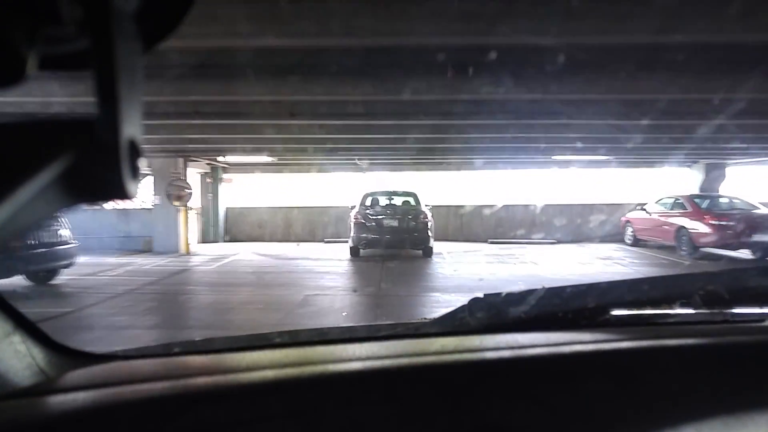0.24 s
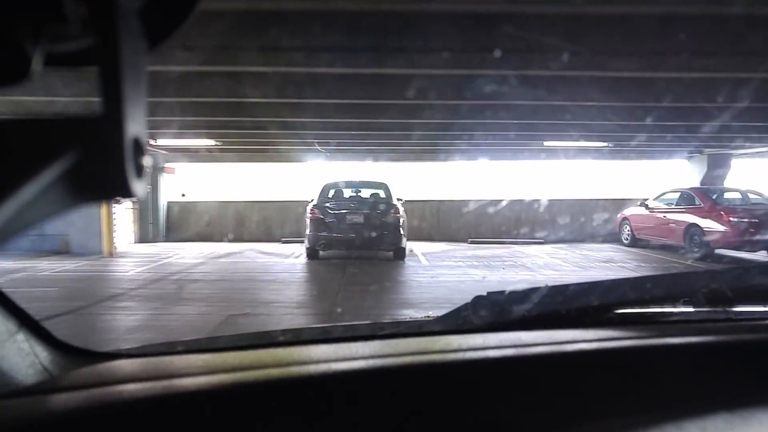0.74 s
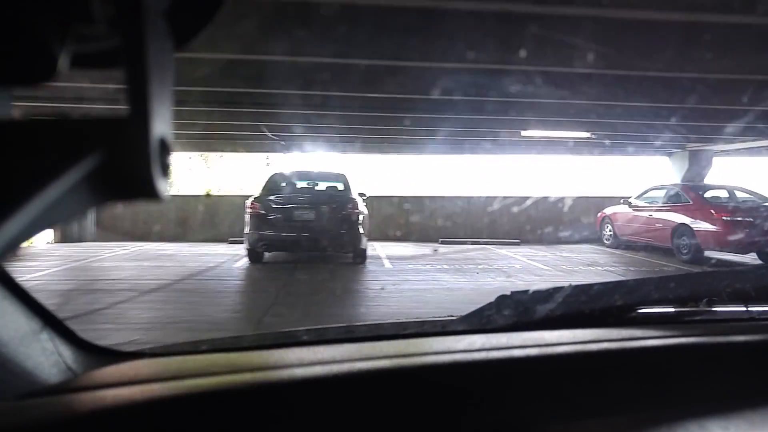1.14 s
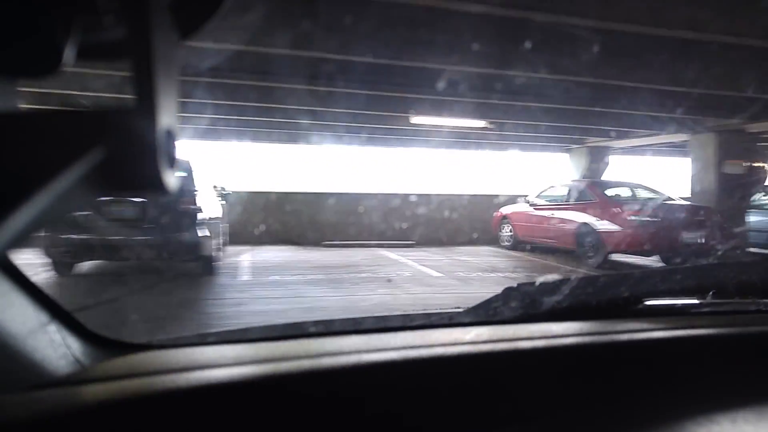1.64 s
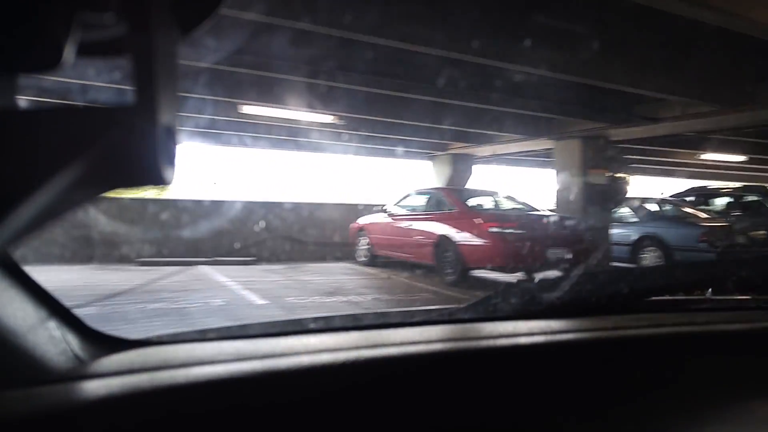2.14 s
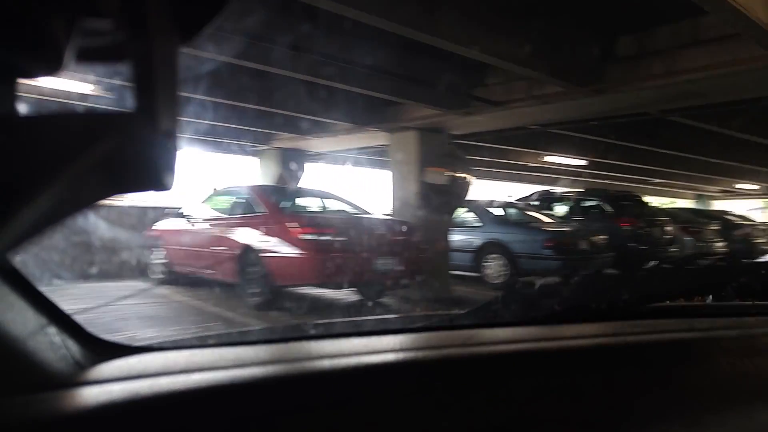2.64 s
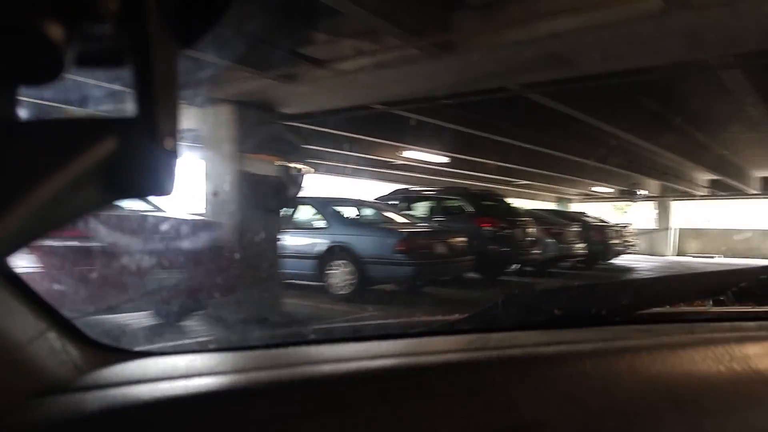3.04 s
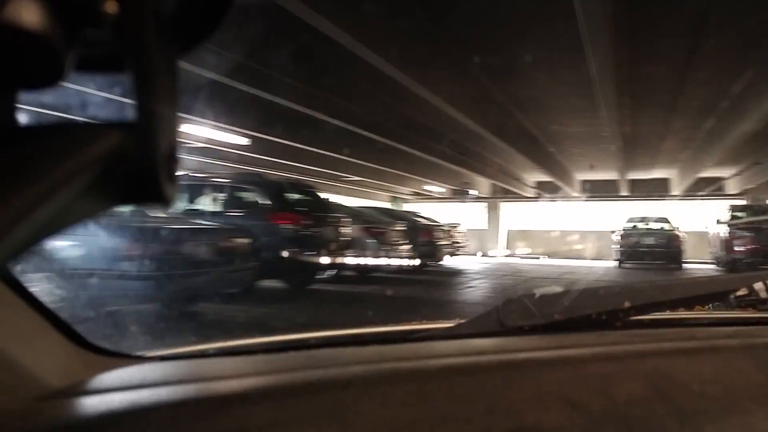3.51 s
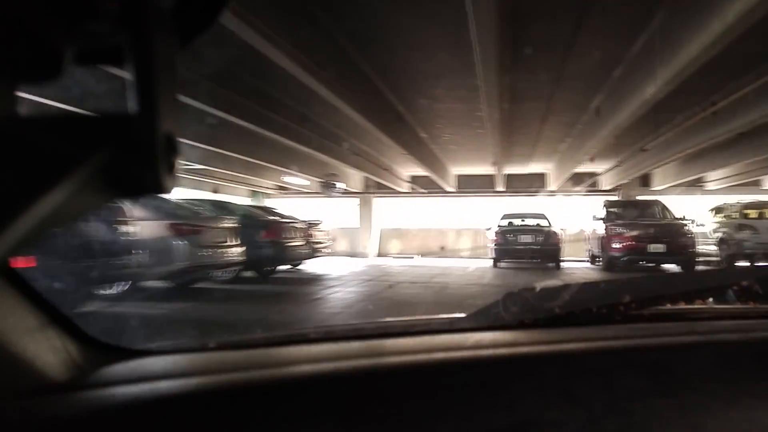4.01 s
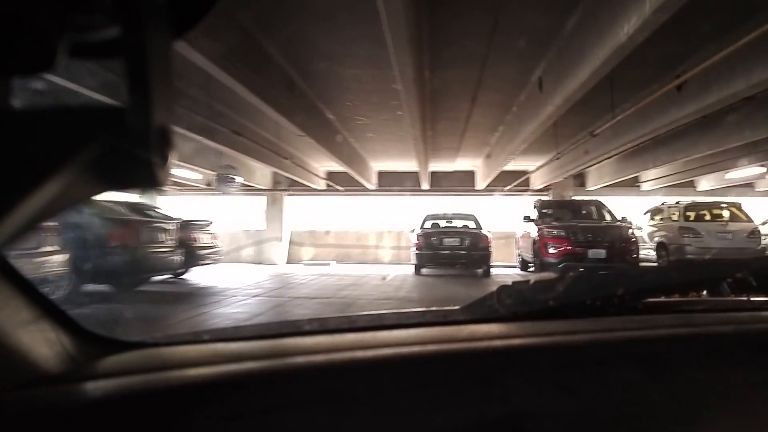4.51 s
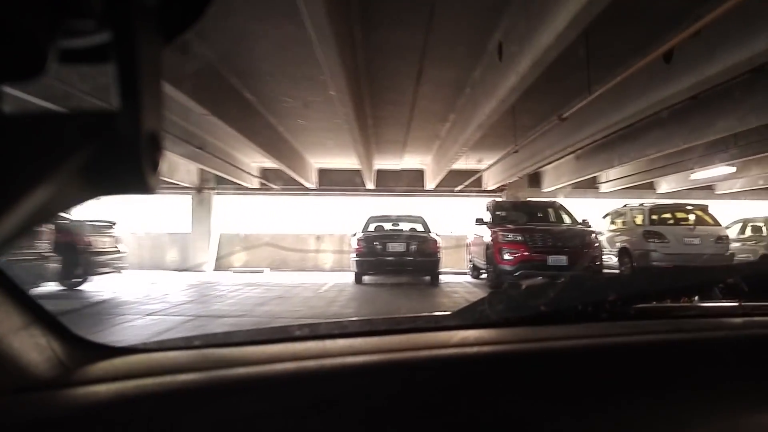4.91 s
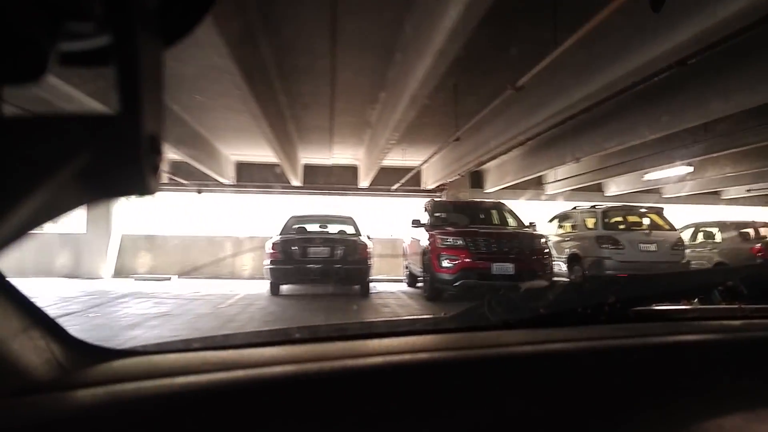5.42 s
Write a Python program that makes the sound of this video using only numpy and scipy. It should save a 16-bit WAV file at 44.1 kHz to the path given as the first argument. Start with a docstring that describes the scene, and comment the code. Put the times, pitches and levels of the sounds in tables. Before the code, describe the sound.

Heard from the driver's seat in an echoing concrete parking garage, a car's loud exhaust runs down in a rough, booming burble with hollow pops. Near the middle a press of throttle brings a short raspy blare, with dry crackles on the left as the microphone overloads. Keys clink sharply, then the engine sinks again through a cluster of thumping pops, with faint tyre hiss and squeal.

```python
"""In a concrete parking garage a car with a loud exhaust rolls along, heard from the driver's seat.
The engine runs down burbling, swells once under throttle, then runs down again and pops.
Firing pulses excite the pipe and the echoing decks; a sine at the firing rate makes the cabin boom.
Shaped noise gives the tyres' hiss and scrubs; decaying modes make the keys clink; loose trim squeaks
in short tone bursts, and brief bursts on the left are the crackles of an overloaded microphone."""
import sys
import numpy as np
from scipy import signal
from scipy.fft import rfft, irfft, next_fast_len
from scipy.io import wavfile
from scipy.ndimage import uniform_filter1d

SR = 44100
rng = np.random.default_rng(int(sys.argv[2]) if len(sys.argv) > 2 else 0)


def wav_out(sig):
    """Save sig, one row per channel (or a flat mono array), as 16-bit PCM at SR to the path in sys.argv[1]."""
    wavfile.write(sys.argv[1], SR, np.round(np.clip(np.atleast_2d(sig).T, -1, 1) * 32767).astype(np.int16))


N = 249606
TIME_S = np.arange(N) / SR

# Firing rate of the four cylinders, the low engine note. Each row: time in seconds, rate in Hz.
FIRING_RATE = [(0, 69.5), (.22, 67.6), (.45, 63), (.75, 58.7), (.95, 53.9), (1.4, 49.4), (1.85, 47.2),
               (2.3, 45.6), (2.65, 47.7), (3.0, 50), (3.2, 55.6), (3.35, 56.8), (3.55, 60), (3.8, 57.7),
               (3.9, 59), (4.08, 62.6), (4.33, 56.2), (4.55, 55.6), (5.2, 46.5), (5.66, 44.5)]


def engine():
    """Common excitation: one engine phase drives every firing, order and resonance."""
    note_hz = in_time(FIRING_RATE)
    note_cycles = np.cumsum(note_hz) / SR
    cycles = note_cycles / len(CYLINDER_STRENGTH)
    rough_pulses = firings(cycles, rough_db=5, jitter_s=.0012)
    burble = firings(cycles, rough_db=3.2, jitter_s=.0006)
    low_tones = drone(rough_pulses, cycles, note_hz) + growl(rough_pulses, cycles, note_hz)
    upper_pipe = rasp(burble) + bark(burble) + blare(burble) + bite(burble)
    return cabin_boom(note_cycles, note_hz) + low_tones + upper_pipe + ringing(cycles)


# Throttle, pressed once. Each row: time in seconds, opening from 0 to 1.
THROTTLE_OPENING = [(2.63, 0.03), (2.72, 0.3), (2.95, 0.69), (3.14, 0.96), (3.3, 0.97), (3.6, 0.02)]
# Strength of each successive firing in an engine cycle. Each row: level in dB.
CYLINDER_STRENGTH = [-4.5, -6.5, -4, -5]


def firings(cycles, rough_db, jitter_s):
    """Impulse train: cylinders differ and each charge burns unevenly, most of all off the throttle."""
    number = np.floor(cycles * len(CYLINDER_STRENGTH)).astype(int)
    at = np.flatnonzero(np.diff(number))
    chance = np.clip(rng.standard_normal((N // 100, 2)), -2, 2)
    strength, lateness = chance[:len(at)].T
    unsteady = 1 - np.clip(in_time(THROTTLE_OPENING)[at], 0, 1) / 2
    delay = (jitter_s * SR * unsteady * lateness).astype(int)
    when = np.clip(at + delay, 0, N - 1)
    cylinder_db = np.array(CYLINDER_STRENGTH)[number[at] % len(CYLINDER_STRENGTH)]
    pulses = np.zeros(N)
    pulses[when] = from_db(cylinder_db + rough_db * unsteady * strength)
    return pulses


GARAGE_T60_S = 2.9


def through_garage(pulses, spectrum, near_t60, tail_db):
    """Convolution with an impulse response: three echo patterns exchange as the car moves on."""
    turn = np.pi * TIME_S / 2
    out = 0
    for k in range(3):
        response = echoing(spectrum, near_t60, tail_db, GARAGE_T60_S)
        path = signal.oaconvolve(pulses[None], response, axes=1)[:, :N]
        out = out + path * np.cos(turn + k * np.pi / 3)
    return out


def tones(cycles, note_hz, orders, pipe, fade, fade_rate):
    """Harmonic resonance: orders swell at the pipe's resonances and fade as the car crosses standing waves."""
    out = 0
    for k, db in orders:
        order_hz = round(k) * note_hz / len(CYLINDER_STRENGTH)
        gain = from_db(db + at_hz(pipe, order_hz))
        wander = 1 + fade * (drift(fade_rate) + 1j * drift(fade_rate))
        carrier = np.exp(2j * np.pi * (round(k) * cycles + rng.random()))
        out = out + gain * (wander * carrier).real
    return rms_one(out)


# Spectrum of the drone. Each row: frequency in Hz, relative density in dB per Hz.
DRONE_SPECTRUM = [(32, -37.5), (44, -19.5), (62, -8.5), (85, -14), (105, -4), (132, -1), (158, -2.5),
                  (190, -10), (260, -44)]
# Tones of the drone. Each row: multiple of the engine cycle, relative level in dB.
DRONE_TONES = [(5, 7.5), (7, 3.5), (8, 3), (9, 1.5), (10, -4), (11, 0), (12, -9), (13, -1)]
# Level of the deep drone. Each row: time in seconds, level in dB.
DRONE_CURVE = [(0, -15.5), (.6, -18), (1.05, -20), (1.5, -20), (1.9, -19), (2.4, -23), (2.62, -21),
               (2.74, -16), (3.05, -14), (3.4, -16.5), (3.65, -18), (3.9, -17), (4.55, -17.5), (4.9, -19.5),
               (5.3, -20.5), (5.66, -18)]


def drone(pulses, cycles, note_hz):
    """Low pipe resonance: echoing pulses and engine orders share one spectrum."""
    sound = rms_one(through_garage(pulses, DRONE_SPECTRUM, near_t60=.13, tail_db=-7.5))
    orders = tones(cycles, note_hz, DRONE_TONES, DRONE_SPECTRUM, fade=.6, fade_rate=2)
    return from_db(in_time(DRONE_CURVE)) * evened(sound + from_db(2.5) * orders, .22)


# Level of the exhaust's rasp, which the growl partly follows. Each row: time in seconds, level in dB.
RASP_CURVE = [(0, -21.5), (1.3, -24), (1.55, -25.5), (1.74, -32), (1.9, -21), (2.4, -40), (3.05, -33),
              (3.23, -17), (3.45, -23.5), (3.83, -24), (3.96, -21), (5.3, -27.5), (5.66, -41)]
# Spectrum of the rasp. Each row: frequency in Hz, relative density in dB per Hz.
RASP_SPECTRUM = [(380, -39), (465, -16), (510, 0.5), (580, 4.5), (645, 0.5), (710, -8), (860, -23.5),
                 (2000, -57)]


def rasp(burble):
    """Amplitude modulation: rough firings make the pipe's echoing middle band throb."""
    sound = through_garage(burble, RASP_SPECTRUM, near_t60=.08, tail_db=-10)
    return from_db(in_time(RASP_CURVE)) * evened(sound, .16)


# Spectrum of the growl. Each row: frequency in Hz, relative density in dB per Hz.
GROWL_SPECTRUM = [(150, -37), (200, -4.5), (240, 1.5), (280, -2), (325, 1), (400, -6), (455, -10),
                  (600, -32.5)]
# Tones of the growl. Each row: multiple of the engine cycle, relative level in dB.
GROWL_TONES = [(15, 1), (17, 1), (18, -1.1), (19, -0.56), (20, -0.081), (21, -1.7)]
# base level: coasting at CRUISE_HZ, with the rasp at its mean level
CRUISE_HZ, GROWL_DB, GROWL_DB_PER_OCTAVE, GROWL_THROTTLE_DB = 53, -25.5, 6, 1
GROWL_FOLLOWS = .16  # share of the rasp's swing in dB


def growl(pulses, cycles, note_hz):
    """Source strength: the pipe's growl increases with engine speed and throttle."""
    rasp_db = in_time(RASP_CURVE)
    level_db = GROWL_DB + GROWL_DB_PER_OCTAVE * np.log2(note_hz / CRUISE_HZ)
    level_db += GROWL_THROTTLE_DB * in_time(THROTTLE_OPENING)
    level_db += GROWL_FOLLOWS * (rasp_db - rasp_db.mean())
    sound = rms_one(through_garage(pulses, GROWL_SPECTRUM, near_t60=.079, tail_db=-14.5))
    orders = tones(cycles, note_hz, GROWL_TONES, GROWL_SPECTRUM, fade=1.0, fade_rate=2.1)
    return from_db(level_db) * evened(sound + from_db(-2.5) * orders, .21)


# Spectrum of the bark. Each row: frequency in Hz, relative density in dB per Hz.
BARK_SPECTRUM = [(540, -33), (660, 1), (715, 1), (790, -2), (880, -5.5), (1020, -13), (1500, -37.5)]
# Level of the bark. Each row: time in seconds, level in dB.
BARK_CURVE = [(0, -24.5), (.88, -29.5), (1.06, -26), (1.73, -31), (1.86, -22), (2.05, -29), (2.5, -40.5),
              (3.08, -38), (3.22, -26.5), (3.41, -25), (3.8, -31.5), (4.05, -28.5), (5.2, -30), (5.66, -42)]


def bark(burble):
    """Upper pipe resonance: the firings excite a bark above the rasp."""
    sound = through_garage(burble, BARK_SPECTRUM, near_t60=.06, tail_db=-11)
    return from_db(in_time(BARK_CURVE)) * evened(sound, .14)


# Spectrum of the blare. Each row: frequency in Hz, relative density in dB per Hz.
BLARE_SPECTRUM = [(200, -27), (290, 2.5), (405, 6), (465, -6), (580, 1.5), (850, -1.5), (1080, -12),
                  (1400, -23.5), (2200, -42.5)]
# Level of the blare. Each row: time in seconds, level in dB.
BLARE_CURVE = [(3.0, -61), (3.13, -36), (3.22, -24), (3.31, -26), (3.41, -14.5), (3.55, -22.5), (3.9, -58)]


def blare(burble):
    """Forced pipe response: a broad blare rises with the throttle and lasts as it closes."""
    sound = through_garage(burble, BLARE_SPECTRUM, near_t60=.04, tail_db=-14)
    return from_db(in_time(BLARE_CURVE)) * evened(sound, .073)


# Spectrum of the bite. Each row: frequency in Hz, relative density in dB per Hz.
BITE_SPECTRUM = [(700, -10.5), (1100, 9), (1400, -5.5), (1700, -3.5), (2200, -11.5), (2800, -20.5),
                 (4000, -24.5), (8000, -50)]
# Level of the bite, higher in pitch than the rasp. Each row: time in seconds, level in dB.
BITE_CURVE = [(0, -42), (.8, -42.5), (1.3, -39), (2.0, -38), (2.4, -44.5), (3.25, -41.5), (3.41, -42),
              (3.65, -41), (4.3, -44), (4.8, -43), (5.3, -42.5), (5.66, -49.5)]


def bite(burble):
    """Broadband impulse response: sharp firings give the exhaust its treble edge."""
    sound = through_garage(burble, BITE_SPECTRUM, near_t60=.03, tail_db=-8)
    return from_db(in_time(BITE_CURVE)) * evened(sound, .056)


# Cabin boom away from the cabin's resonance. Each row: time in seconds, level in dB.
BOOM_CURVE = [(0, -23), (.2, -18), (.45, -27.5), (.73, -21), (.9, -29), (1.15, -19), (1.6, -22),
              (2.35, -28), (3.0, -37), (3.27, -20), (3.43, -31), (3.55, -46), (3.72, -46), (3.82, -23),
              (4.55, -20.5), (5.66, -24.5)]
CABIN_HZ, CABIN_WIDTH_HZ, CABIN_LIFT_DB = 58.7, 1.33, 11.5


def cabin_boom(note_cycles, note_hz):
    """Cavity resonance: the boom swells whenever the firing rate crosses the cabin's own frequency."""
    lift_db = CABIN_LIFT_DB / (1 + ((note_hz - CABIN_HZ) / CABIN_WIDTH_HZ) ** 2)
    tone = np.sqrt(2) * np.sin(2 * np.pi * note_cycles + .22 * drift(12))
    return from_db(in_time(BOOM_CURVE) + lift_db) * tone * from_db([[-.7], [.4]])


# Engine orders taken up by the garage.
# Each row: centre in seconds, multiple of the engine cycle, level in dB, half length in seconds.
GARAGE_RINGS = [(0.09, 7, -23.5, 0.17), (.5, 9, -16.5, 0.18), (0.892, 9, -18, 0.114),
                (1.047, 23, -32.5, 0.12), (1.113, 12, -22.5, 0.085), (1.892, 26, -31.5, 0.126),
                (2.2, 11, -22, 0.13), (2.73, 20, -20, 0.02), (2.804, 13, -24.5, 0.1),
                (2.924, 11, -26, 0.11), (3.12, 12, -14.5, 0.11), (3.22, 16, -19.5, 0.12),
                (3.2, 23, -22.5, 0.12), (3.285, 8, -24, 0.17), (3.34, 11, -19, 0.059),
                (3.643, 11, -21, 0.34), (4.0, 7, -20, 0.1), (4.123, 9, -15, 0.23), (5.095, 12, -21.5, 0.17)]


def ringing(cycles):
    """Room resonance: the garage takes up one engine order for a moment and rings with it."""
    out = 0
    for s, k, db, length in GARAGE_RINGS:
        swell = np.exp(-((TIME_S - s) / length) ** 2)
        tone = np.sqrt(2) * np.sin(2 * np.pi * (round(k) * cycles + rng.random()))
        out = out + from_db(db) * swell * tone
    return out


# Exhaust pops. Each row: start in seconds, thump frequency in Hz, thump level in dB,
# hollow ring level in dB, crack level in dB.
EXHAUST_POPS = [(.286, 147, -30, -16, -29), (.469, 99, -25, -15, -32), (.951, 138, -14, -15.5, -24.5),
                (1.209, 136.4, -11, -18, -24), (1.392, 121, -32, -23, -46), (1.790, 150, -14.5, -15, -27),
                (1.952, 101, -23, -15.5, -33), (4.208, 134, -34, -21.5, -44), (4.367, 136, -22, -18, -22.5),
                (4.465, 140, -28, -34, -24), (4.512, 131, -10.5, -21, -28), (4.774, 239, -17.5, -18, -21),
                (5.054, 135, -10.5, -19.5, -21), (5.163, 242, -20, -19, -23.5),
                (5.297, 144, -18.5, -21, -32)]
# Spectrum of a thump's echo. Each row: frequency in Hz, relative density in dB per Hz.
THUMP_SPECTRUM = [(50, -25), (90, -8), (125, 0), (190, -6), (240, -3), (330, -6), (460, -20), (900, -55)]
# Spectrum of a pop's crack. Each row: frequency in Hz, relative density in dB per Hz.
CRACK_SPECTRUM = [(250, -22), (460, -11), (570, 1), (800, -2), (1100, -10), (1400, -27), (1800, -32),
                  (3000, -50), (6000, -72)]


def pops(crack_s=.043, thump_s=.015, ring_hz=590, ring_s=.0052, echo_db=-12, right_lag_s=.00024):
    """Impulsive combustion: unburnt fuel goes off in the pipe as thump, hollow ring and echoing crack."""
    out, t = np.zeros((2, N)), np.arange(SR // 2) / SR
    thump_swell = np.sqrt(2) * (t / thump_s * np.exp(1 - t / thump_s)) ** 2
    ring_swell = np.sqrt(2) * (t / ring_s * np.exp(1 - t / ring_s)) ** 2
    crack_decay = np.exp(-(t / crack_s) ** 4) + from_db(-11 - 60 * t / .7)
    crack_envelope = (1 - np.exp(-t / .003)) * crack_decay
    echo_envelope = from_db(echo_db - 60 * t / 1.6)
    phase = 2 * np.pi * np.array([t, t - right_lag_s])  # per Hz, left and right
    ring = ring_swell * np.sin(ring_hz * phase)
    for s, hz, thump_db, ring_db, crack_db in EXHAUST_POPS:
        thump = thump_swell * np.sin(hz * phase) + stereo_noise(THUMP_SPECTRUM, echo_envelope)
        crack = stereo_noise(CRACK_SPECTRUM, crack_envelope)
        add(out, s, from_db(thump_db) * thump + from_db(ring_db) * ring + from_db(crack_db) * crack)
    return out


# Rolling hiss. Each row: time in seconds, level in dB.
ROLLING_CURVE = [(0, -51), (.7, -51), (1.6, -46.5), (1.86, -45.5), (1.99, -52.5), (2.1, -49), (2.4, -54.5),
                 (2.85, -45), (3.17, -44), (3.62, -52), (3.85, -46), (4.12, -49.5), (5.1, -47), (5.36, -47),
                 (5.66, -52.5)]
# Spectrum of the hiss. Each row: frequency in Hz, relative density in dB per Hz.
HISS_SPECTRUM = [(1000, -10.5), (2500, 4), (3200, -2), (4200, -2), (4730, -1), (5600, -2.5), (6900, 1.5),
                 (7850, -3), (8500, 3), (9600, -1.5), (11000, -6), (13000, -8), (15500, -19)]


def rolling():
    """Surface roughness: the tyres' fine hiss flutters with the grain of the concrete."""
    return stereo_noise(HISS_SPECTRUM, from_db(in_time(ROLLING_CURVE) + .5 * drift(20)))


# Tyres scrub on the smooth floor.
# Each row: centre in seconds, scrub level in dB, spray level in dB, half length in seconds.
TYRE_SCRUBS = [(0.075, -37.5, -69, 0.28), (1.031, -36.5, -61, 0.06), (1.272, -37.5, -46, 0.036),
               (1.861, -32, -46, 0.033), (2.048, -42, -64, 0.15), (2.56, -63, -48, 0.023),
               (4.392, -53, -44, 0.017), (4.482, -41, -54, 0.041), (4.794, -50, -42.5, 0.026),
               (4.92, -41, -52, 0.073), (5.087, -46, -49, 0.087)]
# Spectrum of a scrub. Each row: frequency in Hz, relative density in dB per Hz.
SCRUB_SPECTRUM = [(850, -28), (1150, 13), (1750, 3.5), (2200, -3.5), (3000, -26.5), (12000, -35)]
# Spectrum of the spray of grit. Each row: frequency in Hz, relative density in dB per Hz.
SPRAY_SPECTRUM = [(2500, -8), (4700, 3), (5800, 2), (7000, 3), (9000, 7.5), (11000, 0), (14500, -8),
                  (16000, -18)]


def scrubs():
    """Friction noise: short scrubs judder while grit sprays."""
    scrubbing, spraying = np.zeros((2, N))
    for s, scrub_db, spray_db, length in TYRE_SCRUBS:
        swell = np.exp(-((TIME_S - s) / length) ** 2)
        scrubbing += from_db(scrub_db) * swell
        spraying += from_db(spray_db) * swell
    judder = from_db(2.2 * drift(70) - .5)
    return stereo_noise(SCRUB_SPECTRUM, scrubbing * judder) + stereo_noise(SPRAY_SPECTRUM, spraying)


# Spectrum of a tyre's squeal. Each row: frequency in Hz, relative density in dB per Hz.
SQUEAL_SPECTRUM = [(1450, -22), (1740, -4), (2050, -26)]
# Level of the squeal. Each row: time in seconds, level in dB.
SQUEAL_CURVE = [(4.25, -74), (4.47, -46), (4.68, -60), (4.92, -52.5), (5.3, -48.5), (5.66, -66)]


def squeal():
    """Narrow-band friction noise: a tyre squeals faintly on the smooth floor."""
    return stereo_noise(SQUEAL_SPECTRUM, from_db(in_time(SQUEAL_CURVE)))


# Keys knock together on their ring. Each row: start in seconds, relative level in dB.
KEY_KNOCKS = [(.433, -50), (.461, -51), (.52, -51), (1.531, -50), (3.11, -48), (3.15, -46), (3.215, -48),
              (3.33, -51), (3.8934, -28.5)]
# Spectrum of a knock. Each row: frequency in Hz, relative density in dB per Hz.
KNOCK_SPECTRUM = [(2000, -40), (4500, -19), (7500, -15), (9500, -3), (12000, -8), (14500, -4), (16000, -10)]
# Modes of the keys. Each row: frequency in Hz, relative level in dB, 60 dB decay time in seconds.
KEY_RESONANCES = [(9450, -6, .12), (10500, -4, .12), (11000, -13, .15), (12100, -12, .1), (14110, -10, .13),
                  (14305, -12, .13), (14495, -10, .13), (14830, -10, .12), (15450, -6, .1)]


def keys():
    """Modal vibration: a bright crack and a thin ring that meets each microphone in its own phase."""
    out, t = np.zeros((2, N)), np.arange(SR // 3) / SR
    crack_envelope = from_db(-60 * t / .025) + from_db(-15 - 60 * t / .2)
    for s, db in KEY_KNOCKS:
        crack = stereo_noise(KNOCK_SPECTRUM, crack_envelope)
        ring = 0
        for hz, mode_db, t60 in KEY_RESONANCES:
            mode = np.sin(2 * np.pi * (hz * t + rng.random((2, 1))))
            ring = ring + from_db(mode_db - 60 * t / t60) * mode
        add(out, s, from_db(db + 3) * crack + from_db(db - 12) * ring)
    return out


# Tiny squeaks. Each row: centre in seconds, level in dB in the left channel.
TRIM_SQUEAKS = [(2.815, -43), (3.555, -44), (5.0, -45)]


def trim(squeak_hz=8500, squeak_s=.008):
    """Gaussian tone burst: loose trim squeaks thinly, mostly on the left."""
    swell = np.zeros(N)
    for s, db in TRIM_SQUEAKS:
        swell += from_db(db) * np.exp(-((TIME_S - s) / squeak_s) ** 2)
    squeaks = swell * np.sin(2 * np.pi * squeak_hz * TIME_S + drift(120))
    return squeaks * from_db([[1], [-9]])


# The left microphone crackles, overloaded around the throttle's release.
# Each row: centre in seconds, peak level in dB.
OVERLOAD_CRACKLES = [(3.352, -18), (3.3695, -18), (3.3968, -12.5), (3.475, -12.5)]


def overload(crackle_hz=1700, crackle_s=.00019):
    """Transducer overload: dry crackles of the left microphone, each a very short cosine burst."""
    crackles = np.zeros(N)
    for s, db in OVERLOAD_CRACKLES:
        since = TIME_S - s
        burst = np.exp(-(since / crackle_s) ** 2) * np.cos(2 * np.pi * crackle_hz * since)
        crackles += from_db(db) * burst
    return crackles * [[1], [0]]


def from_db(db):
    """Logarithmic level: decibels become an amplitude ratio."""
    return 10 ** (np.asarray(db) / 20)


def rms_one(x):
    """Effective value: scale to a root mean square of 1."""
    return x / np.sqrt(np.mean(x ** 2) + 1e-20)


def in_time(rows):
    """Linear interpolation: a curve at every sample, its corners rounded by a 40 ms mean."""
    s, value = np.transpose(rows)
    return uniform_filter1d(np.interp(TIME_S, s, value), size=SR // 25)


def at_hz(points, hz):
    """Logarithmic pitch: read a spectrum on a log-frequency axis."""
    f, value = np.transpose(points)
    return np.interp(np.log(hz + 1e-9), np.log(f), value)


def drift(rate):
    """Low-passed chance: random motion with spread 1 and about `rate` turns a second."""
    hz = np.arange(N // 2 + 1) * SR / N
    return rms_one(irfft(rfft(rng.standard_normal(N)) / (1 + (hz / rate) ** 4), N))


# Likeness of the two microphones. Each row: frequency in Hz, correlation from -1 to 1.
MIC_LIKENESS = [(60, .98), (130, .93), (290, .85), (450, .65), (640, .25), (1000, -.35), (1400, -.4),
                (2400, 0), (15000, 0)]
# Balance of the two microphones. Each row: frequency in Hz, left minus right in dB.
MIC_BALANCE = [(55, -9.5), (130, 0), (240, -1), (320, -1), (560, 2.5), (1000, 2), (2000, 2), (3200, 0.5),
               (7200, -0.5), (8500, 9.5), (10000, 5.5), (14000, -1)]


def stereo_noise(spectrum, envelope):
    """Spatial coherence: noise alike in the bass, partly opposed in the middle, unrelated in the treble."""
    n = 2 * next_fast_len(len(envelope) // 2 + 2048, True)
    mid, side = rfft(rng.standard_normal((2, len(envelope))) * envelope, n)
    hz = np.arange(1, len(mid) + 1) * SR / n
    sides = np.array([[1], [-1]])  # left, right
    alike = np.clip(at_hz(MIC_LIKENESS, hz), -1, 1)
    pair = np.sqrt((1 + alike) / 2) * mid + np.sqrt((1 - alike) / 2) * side * sides
    # roll off beyond the spectrum's first and last points
    skirts_db = -20 * np.log10((1 + (hz / spectrum[-1][0]) ** 2) * (1 + spectrum[0][0] / hz))
    colour = causal(at_hz(spectrum, hz) + skirts_db + sides * at_hz(MIC_BALANCE, hz) / 2)
    colour = colour / np.sqrt(np.mean(np.abs(colour) ** 2))  # rms 1 where the envelope is 1
    return irfft(pair * colour, n)[:, :len(envelope)]


def causal(gain_db):
    """Minimum phase: the filter with these gains lets nothing sound before its cause."""
    cepstrum = irfft(np.log(from_db(gain_db)))
    half = cepstrum.shape[-1] // 2
    cepstrum[:, 1:half] *= 2
    cepstrum[:, half + 1:] = 0
    return np.exp(rfft(cepstrum))


def echoing(spectrum, near_t60, tail_db, tail_t60):
    """Two-slope decay: one second of dense near reflections and a long tail."""
    t = np.arange(SR) / SR
    return stereo_noise(spectrum, from_db(-60 * t / near_t60) + from_db(tail_db - 60 * t / tail_t60))


def evened(x, seconds):
    """Short-time power: bring the level to 1 over the given time; faster throbs stay."""
    power = np.mean(np.atleast_2d(x) ** 2, axis=0)
    size = max(int(seconds * SR), 2)
    smooth = uniform_filter1d(uniform_filter1d(power, size), size)
    return x / np.sqrt(np.abs(smooth) + 1e-12)


def add(out, s, sound):
    """Superposition: mix a sound in from time s."""
    i = int(np.clip(round(s * SR), 0, N - 1))
    out[:, i:i + sound.shape[-1]] += sound[..., :N - i]


def scene():
    """Superposition of all sources, with a 5 ms fade-in."""
    fade_in = np.minimum(TIME_S / .005, 1)
    tyres = rolling() + scrubs() + squeal()
    return fade_in * (engine() + pops() + tyres + keys() + trim() + overload())


def record(dry):
    """Band limiting and saturation: deepest bass is shed, peaks are rounded, the top is cut."""
    x = signal.sosfilt(signal.butter(8, 37, "high", fs=SR, output="sos"), dry)
    x = x / (1 + (x / .95) ** 8) ** (1 / 8)
    return signal.sosfilt(signal.ellip(10, .2, 80, 15700, fs=SR, output="sos"), x)


dry = scene()
out = record(dry)
wav_out(out)
```